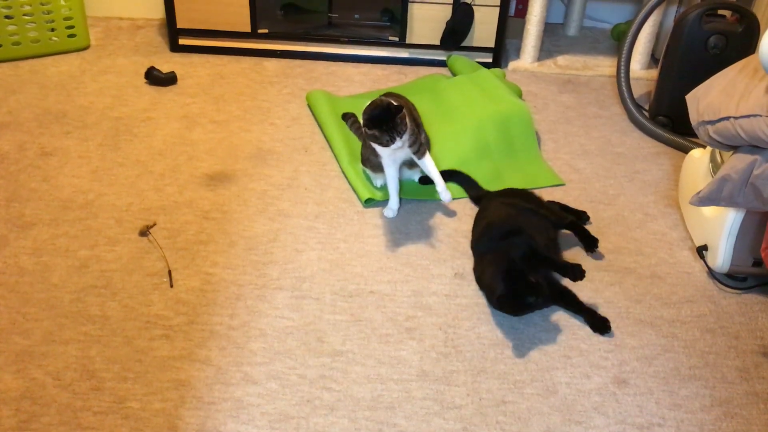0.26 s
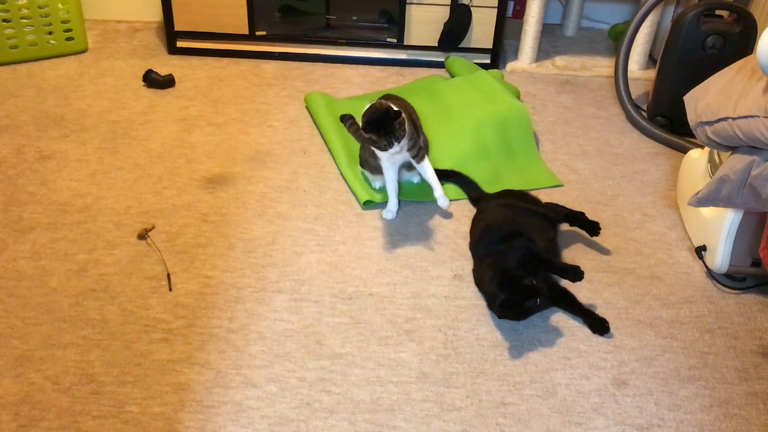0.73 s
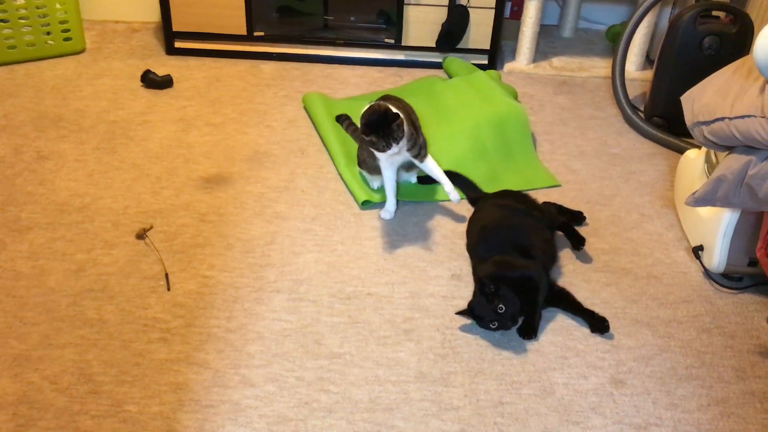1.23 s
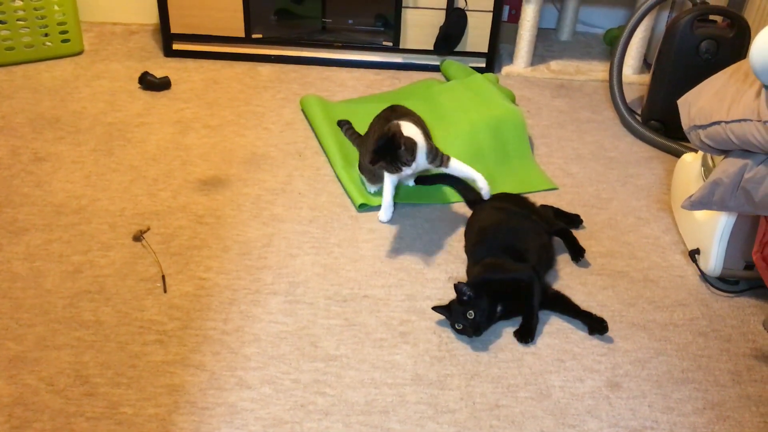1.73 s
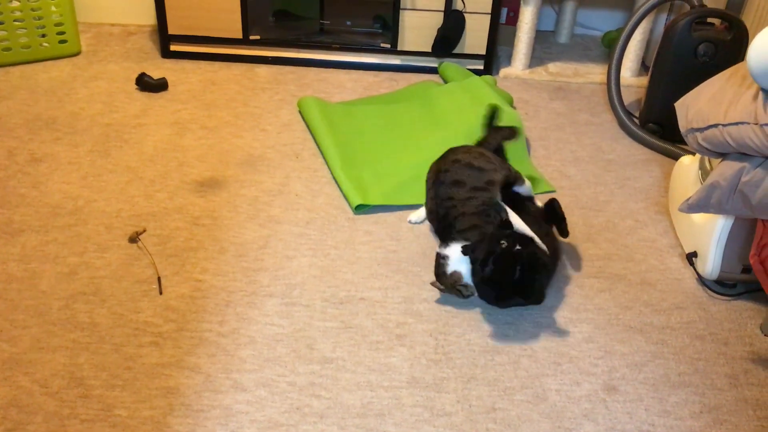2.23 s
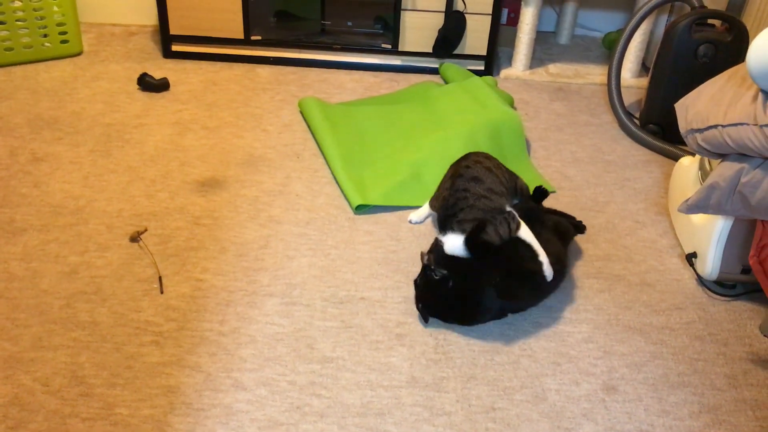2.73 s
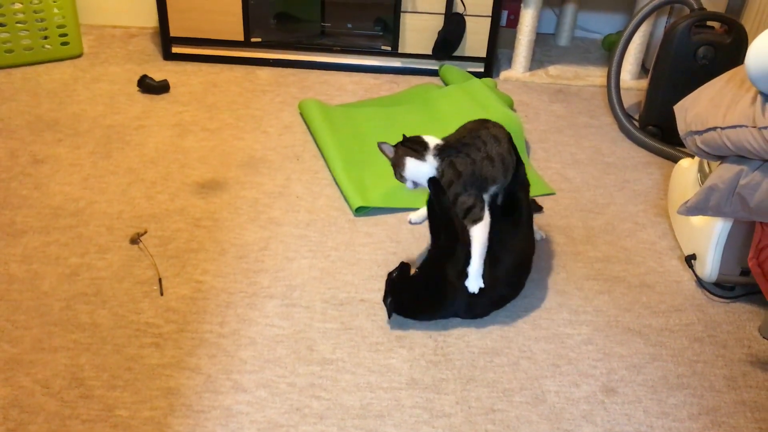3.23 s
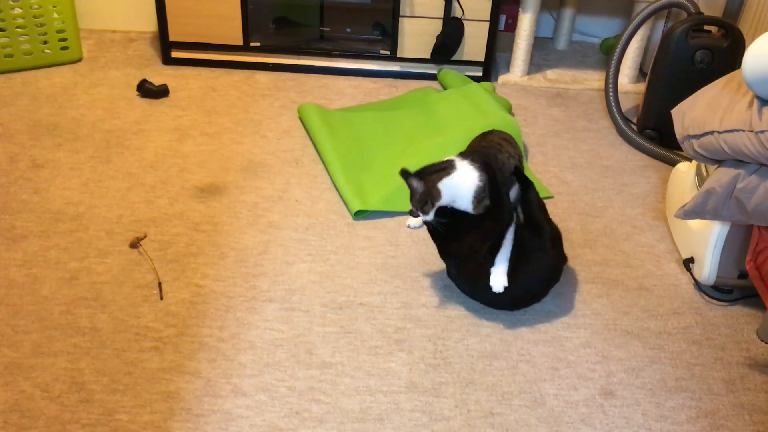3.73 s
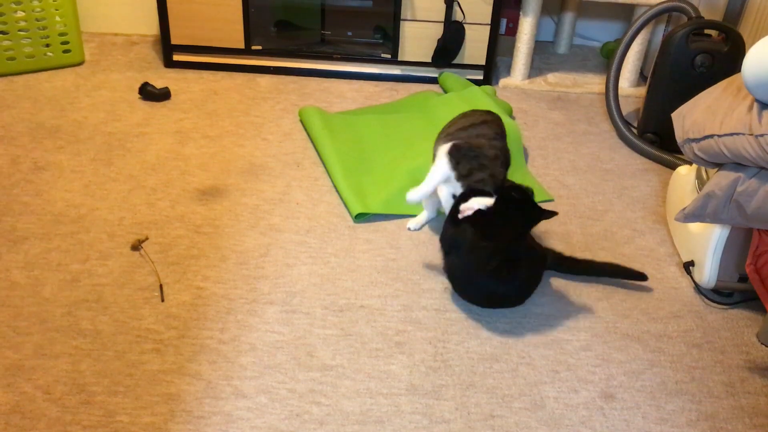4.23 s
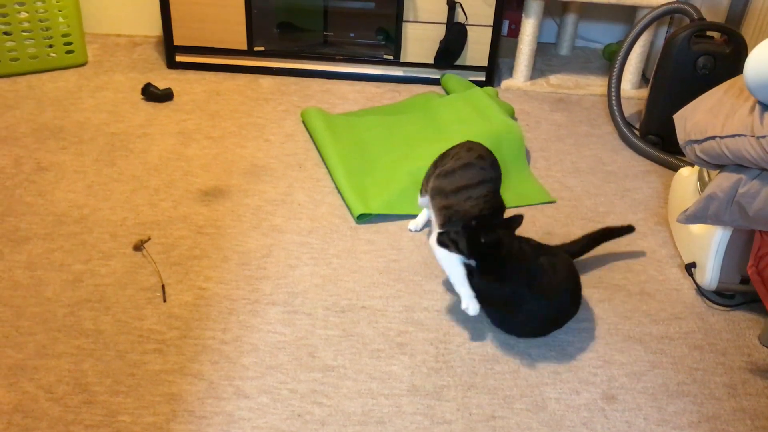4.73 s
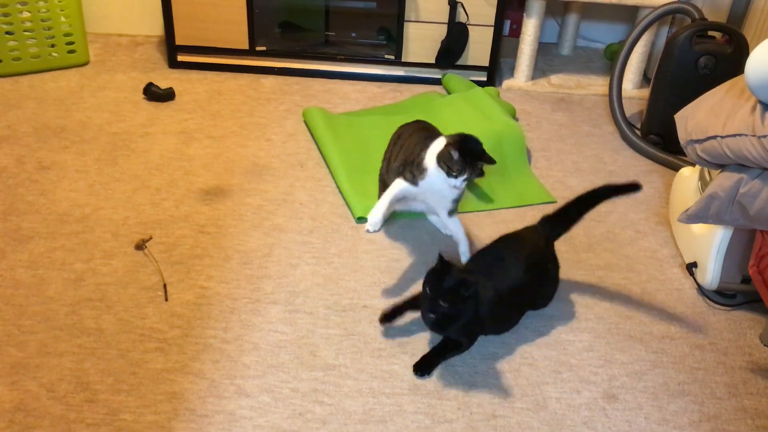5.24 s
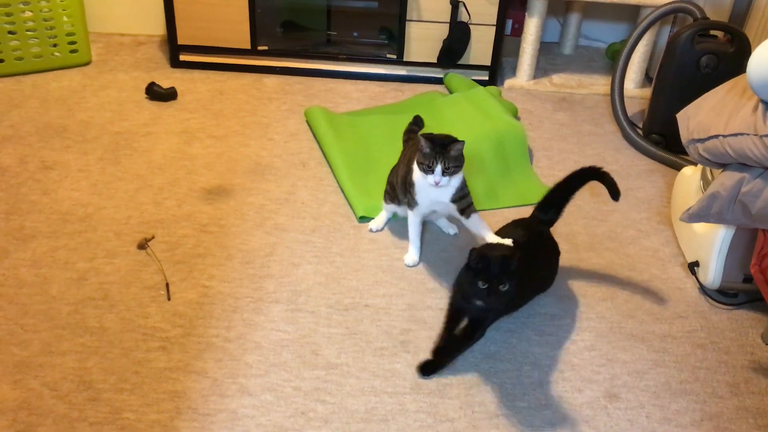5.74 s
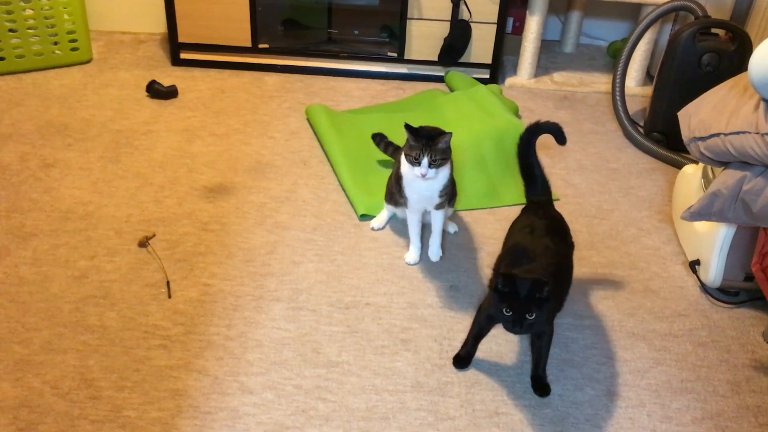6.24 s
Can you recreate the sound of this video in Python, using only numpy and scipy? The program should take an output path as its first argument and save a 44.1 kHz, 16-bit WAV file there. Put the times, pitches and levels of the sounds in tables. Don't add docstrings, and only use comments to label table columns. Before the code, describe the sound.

A quiet furnished living room, heard from a few metres away: a low, slightly wavering rumble and deep hum, soft hiss, and tiny high ticks about ten times a second close to the microphone. A very faint thin whine flutters underneath. Until 1.7 s there is almost nothing else, just slight rubs at 0.5 and 1.5. A soft slap at 1.75 and small claw clicks from 2.0 lead to a brief brushing scrape at 2.3. A firm slap and thud land at 2.45, then the deepest, heaviest floor thump at 2.58. Fur rustles, and another strong thud with crisp claw clicks comes at 3.05. Quiet brushing follows until light hollow knocks at 4.2, a click at 4.3 and fur sweeps to 4.7. Smaller dull thumps, pats and scuffs come at 4.75, 5.07, 5.35-5.45, 5.7, 5.93 and 6.3. The whine is slightly clearer after 4.2. The room echo is short.

```python
import sys
import numpy as np
from scipy import signal
from scipy.fft import rfft, irfft, dct
from scipy.io import wavfile
from scipy.ndimage import uniform_filter1d

SR = 44100
rng = np.random.default_rng(int(sys.argv[2]) if len(sys.argv) > 2 else 0)


def unload_audio(sound):
    columns = np.transpose(np.atleast_2d(sound))
    steps = np.round(np.clip(columns, -1, 1) * 32767)
    wavfile.write(sys.argv[1], SR, steps.astype(np.int16))


def gain_from_db(level_db):
    decades = np.asarray(level_db, float) / 20
    return 10 ** decades


N = 285327

# frequency in Hz, level in dB per Hz.
AIR_COLOUR = [(41, -18), (70, 4.5), (124, -6), (190, 0.5), (228, -6), (344, -10.5), (483, -15.5),
              (554, -14), (977, -18.5), (2660, -27.5), (2980, -24), (3330, -27), (10400, -33), (12500, -32),
              (16000, -38.5)]
AIR_DB = -62
RUMBLE_WAVER_DB, RUMBLE_WAVER_PER_S = 2.2, 9

# time in seconds, level in dB.
WHINE_LEVEL = [
    (0, -80),
    (1.6, -81.5),
    (2.1, -90),
    (2.25, -82),
    (2.305, -63),
    (2.36, -85),
    (3.0, -86.5),
    (3.85, -84.5),
    (4.2, -76.5),
    (6.47, -77.5),
]
WHINE_HZ, WHINE_FLUTTER_DB, WHINE_BEADS_PER_S = 2926, 7.0, 19
HUM_HZ, HUM_DB, HUM_PHASE = 39.56, -47.5, 4.1

# tick number, lateness in seconds, level change in dB.
ODD_TICKS = [
    (2, -.0126, 0),
    (4, -.0198, 0),
    (9, -.001, 0),
    (11, 0, -20),
    (12, .001, -9),
    (14, 0, -8),
    (24, 0, -20),
    (31, -.0079, 0),
    (34, 0, -9),
    (53, -.0194, 0),
]
TICK_START_S, TICK_PERIOD_S = .0596, .1024
TICK_DB, TICK_HZ, TICK_WIDTH_HZ = -50, 13300, 5500

# start in seconds, level in dB, pitch in Hz.
CLAW_CATCHES = [(2.002, -50, 6540), (2.0016, -49, 3200), (2.057, -53, 5000), (2.063, -47.5, 3800),
                (2.0867, -47.5, 3400), (2.1534, -57, 9000), (2.641, -46, 5100), (2.655, -42.5, 9000),
                (2.662, -50, 5500), (3.0528, -38.5, 4520), (3.054, -42.5, 1500), (3.0655, -44, 7040),
                (4.2985, -51, 9000), (4.3052, -41.5, 2930), (4.405, -52.5, 5470), (4.9427, -48, 6900),
                (5.3810, -66, 2200), (5.9480, -49.5, 4440)]
# middle in seconds, length in seconds, level in dB, pitch in Hz, width in Hz.
CLAW_SQUEAK = (5.425, .05, -74, 7100, 900)

# pitch in Hz, T60 in seconds.
BOARDS = [(78, 0.3), (88, 0.16), (112, 0.26), (137, 0.17), (175, 0.15), (196, 0.19), (240, 0.11),
          (265, 0.063), (300, 0.052), (350, 0.097), (444, 0.12), (743, 0.034)]
# start in seconds, level in dB, pitch struck in Hz, reach in octaves.
FALLS = [(2.278, -48, 144.5, 0.13), (2.459, -36, 365, 0.23), (2.46, -40.5, 188, 0.28),
         (2.460, -68, 743, .1), (2.577, -24, 89, .05), (2.58, -64, 188, 0.13), (2.658, -44.5, 79.5, 0.11),
         (3.046, -29.5, 171, 0.069), (3.047, -41.5, 270, 0.14), (3.056, -41.5, 150.5, 0.19),
         (3.064, -47, 245, 0.23), (3.085, -47.5, 140, .1), (3.1, -64, 220, 0.075), (4.752, -48, 195, 0.13),
         (4.752, -53, 288, 0.16), (4.81, -49.5, 205, .15), (4.857, -56, 134, .1),
         (5.068, -42, 116.4, 0.078), (5.066, -48.5, 265, 0.11), (5.085, -41, 176, 0.063),
         (5.335, -38.5, 87, 0.11), (5.385, -43, 175, 0.093), (5.439, -45.5, 140, .1),
         (5.46, -47, 82, 0.079), (5.689, -49.5, 184, 0.14), (5.928, -46, 118, 0.26),
         (6.267, -48.5, 135, .1), (6.321, -44, 129, 0.18), (6.322, -49, 175, 0.11)]
PINNED_DB = -24
# start in seconds, level in dB, pitch in Hz, T60 in seconds.
KNOCKS = [
    (4.181, -55, 1300, .06),
    (4.193, -56, 1450, .06),
    (5.059, -55, 985, .14),
    (6.314, -55, 1080, .07),
]

# pitch in Hz, width in Hz, level in dB.
FLESH = [
    (326, 336, 9),
    (576, 520, 1),
]
# pitch in Hz, width in Hz, level in dB.
FIBRES = [
    (3800, 3500, 0),
    (7500, 6000, -3),
    (13000, 8000, -8),
]
# start in seconds, pad level in dB, pad pitch in Hz,
# flesh in dB above the pad, fibres in dB above the pad.
SLAPS = [(1.735, -54, 1440, -16, -8), (2.063, -63.5, 1070, 9, -2), (2.459, -41.5, 840, -23, -34),
         (3.05, -66, 2800, -14, 8), (4.179, -54.5, 1250, -19, -14), (4.193, -60.5, 1330, -1, -29),
         (4.307, -63.5, 1520, 0, -8), (4.754, -56.5, 720, -4.5, -25), (5.058, -83, 930, 4, -16),
         (5.333, -70, 1300, 7, -1), (5.351, -58.5, 1010, 7.5, -33), (5.403, -60.5, 1580, 9, -14),
         (5.68, -63, 1390, 5, -10), (5.708, -55.5, 850, -24, -17), (6.315, -55, 1120, -4.5, -35)]
SLAP_T60_S, SLAP_AT_DB, SLAP_LONGER_PER_DB = 0.083, -47, 0.11
# middle in seconds, length in seconds, pad level in dB, pad pitch in Hz.
RUBS = [(0.502, 0.018, -72, 1400), (0.542, 0.028, -67.5, 1380), (1.526, 0.052, -71, 1450),
        (2.076, 0.057, -71, 1280), (2.309, 0.04, -50.5, 1000), (2.303, .046, -53.5, 1690),
        (2.305, 0.096, -66.5, 2690), (2.644, 0.04, -70.5, 1500), (3.553, 0.11, -76.5, 1420),
        (4.654, 0.045, -70, 1770), (4.804, 0.054, -74, 700), (5.338, 0.025, -59.5, 930),
        (5.386, .035, -54.5, 840), (1.768, 0.03, -63.5, 1500), (5.437, 0.045, -69.5, 2290),
        (5.72, 0.24, -80, 1504), (6.319, 0.018, -61.5, 2000), (6.426, 0.056, -68.5, 1390)]
RUB_FLESH_DB, RUB_FIBRES_DB = -72, -19
# middle in seconds, length in seconds, level in dB, flesh in dB above it.
SWEEPS = [(1.983, 0.13, -83, 7), (2.536, 0.057, -70, 9), (2.305, 0.11, -78, -18), (2.664, 0.037, -83, -8),
          (2.794, 0.56, -81.5, 6.5), (3.082, 0.018, -74, -15), (3.41, 0.2, -79.5, -10),
          (4.323, 0.2, -78.5, 7), (4.526, 0.1, -75, 0.5), (4.6, 0.094, -75, 2), (5.214, 0.22, -79.5, 9.5),
          (5.943, 0.14, -85.5, 15.5), (6.25, 0.13, -83.5, 17.5)]
SWEEP_HZ, SWEEP_FIBRES_DB = 1500, 3.5
PAD_WIDTH_SHARE = 0.77

ROOM_T60_S, ROOM_DB = 0.27, -7

NOTCH_HZ, NOTCH_WIDTH_HZ, NOTCH_SHARE = 10550, 660, 0.43
TOP_HZ = 15850
# middle in seconds, emptied above in Hz.
TREBLE_GAPS = [(.004, 3200), (.115, 3200), (.392, 3200), (.544, 3200), (.713, 2200), (.820, 1250),
               (.841, 3800), (1.013, 3200), (1.163, 1300), (1.184, 3200), (1.651, 1800), (1.822, 2200),
               (3.252, 1600), (3.572, 2200), (5.768, 2500), (6.326, 4000)]
# middle in seconds, thinned above in Hz.
TREBLE_THINS = [
    (1.462, 3200),
    (2.526, 3000),
    (2.762, 4500),
    (2.908, 3500),
    (2.996, 3500),
    (3.273, 1800),
    (3.871, 3500),
    (4.425, 3000),
    (6.281, 2600),
]
GAP_KEEP, THIN_KEEP = .022, .075


def unit(x):
    return x / np.sqrt(np.mean(x ** 2))


def band(x, hz, width):
    return signal.lfilter(*signal.iirpeak(hz, hz / max(width, 1), SR), x)


def body(x, modes):
    return unit(sum(gain_from_db(db) * band(band(x, hz, width), hz, width) for hz, width, db in modes))


def walk(rate):
    hold = int(SR / rate)
    steps = np.repeat(rng.standard_normal(N // hold + 1), hold)
    return 1.3 * uniform_filter1d(uniform_filter1d(steps, hold), hold)[:N]


def fade(t, t60):
    return (t >= 0) * np.exp(-np.log(1000) * np.clip(t, 0, 1) / max(t60, .005))


def swell(t, length):
    return np.exp(-.5 * (t / (0.37 * length)) ** 2)


def uneven_grains(shape):
    return rng.standard_normal(shape) * gain_from_db(2.5 * rng.exponential(size=shape))


def add(out, s, sound):
    at = int(s * SR)
    out[at:at + len(sound)] += sound[:N - at]


def air():
    hz = np.fft.rfftfreq(N, 1 / SR)
    f, db = np.transpose(AIR_COLOUR)
    colour = gain_from_db(np.interp(np.log(hz + 1), np.log(f), db, left=-90))
    low = 1 / (1 + (hz / 400) ** 2)
    noise = rfft(rng.standard_normal(N)) * colour
    rumble = irfft(noise * low, N) * gain_from_db(RUMBLE_WAVER_DB * walk(RUMBLE_WAVER_PER_S))
    hiss = irfft(noise * (1 - low), N)
    return gain_from_db(AIR_DB) * unit(rumble + hiss)


def pump(t):
    hum_level = gain_from_db(HUM_DB + 0.19 * walk(1.7))
    hum = hum_level * np.sqrt(2) * np.sin(2 * np.pi * HUM_HZ * t + HUM_PHASE)
    beads = np.sin(2 * np.pi * WHINE_BEADS_PER_S * t + 2.5 * walk(9)) + .6 * walk(50) + .3
    tone = np.sin(2 * np.pi * WHINE_HZ * t + .4 * walk(30))
    whine = unit(tone * gain_from_db(WHINE_FLUTTER_DB * np.tanh(2 * beads)))
    return hum + whine * gain_from_db(np.interp(t, *np.transpose(WHINE_LEVEL)))


def drive_ticks():
    count = int((N / SR - TICK_START_S) / TICK_PERIOD_S) + 1
    when = TICK_START_S + TICK_PERIOD_S * np.arange(count)
    db = TICK_DB + 0.83 * rng.standard_normal(count)
    for k, late, change in ODD_TICKS:
        when[k] += late
        db[k] += change
    at = (when * SR).astype(int)
    spikes = np.zeros(N)
    spikes[at] = gain_from_db(db)
    spikes[at + int(.0009 * SR)] = gain_from_db(db - 6)
    tick = band(band(spikes, TICK_HZ, TICK_WIDTH_HZ), TICK_HZ, TICK_WIDTH_HZ)
    return 3.5 * (tick + .15 * band(spikes, 8200, 2800))


def claw_clicks():
    spike = np.eye(1, 400)[0]
    out = np.zeros(N)
    for s, db, hz in CLAW_CATCHES:
        click = band(band(spike, hz, .9 * hz), hz, .9 * hz)
        add(out, s, gain_from_db(db) * click / np.abs(click).max())
    return out


def claw_squeak(t):
    s, length, db, hz, width = CLAW_SQUEAK
    return swell(t - s, length) * gain_from_db(db) * body(uneven_grains(N), [(hz, width, 0)])


def thumps(t):
    rings = list(KNOCKS)
    for s, db, near_hz, reach in FALLS:
        for hz, t60 in BOARDS:
            far_db = 6 * (np.log2(hz / near_hz) / reach) ** 2
            if far_db < 30:
                rings.append((s, db - far_db, hz, t60 / (1 + gain_from_db(db - PINNED_DB))))
    since = t[:SR // 2]
    shake = rng.standard_normal(N + SR)
    out = np.zeros(N)
    for s, db, hz, t60 in rings:
        soft = 1 - fade(since, 800 / hz ** 2 + .004)
        at = int(s * SR)
        loose = .3 * body(shake[at:at + SR // 2], [(1.2 * hz, .7 * hz, 0)])
        ring = np.sin(2 * np.pi * hz * since) + loose
        add(out, s, gain_from_db(db) * soft * fade(since, t60) * ring)
    return out


def paws(t):
    flesh_grains, fibre_grains, pad_grains = uneven_grains((3, N + SR))
    flesh, fibres = body(flesh_grains, FLESH), body(fibre_grains, FIBRES)
    jerks = np.resize(gain_from_db(2.5 * walk(120)), N + SR)
    near = t[:SR] - .5
    presses = []
    for s, db, hz, flesh_db, fibres_db in SLAPS:
        t60 = SLAP_T60_S * gain_from_db(SLAP_LONGER_PER_DB * (db - SLAP_AT_DB))
        presses.append((s, fade(near, t60), db, hz, flesh_db, fibres_db))
    for s, length, db, hz in RUBS:
        presses.append((s, swell(near, length), db, hz, RUB_FLESH_DB - db, RUB_FIBRES_DB))
    for s, length, db, flesh_db in SWEEPS:
        presses.append((s, swell(near, length), db, SWEEP_HZ, flesh_db, SWEEP_FIBRES_DB))
    out = np.zeros(N)
    for s, press, db, hz, flesh_db, fibres_db in presses:
        start = int((s - .5) * SR)
        at = slice(start, start + SR)
        pad = jerks[at] * body(pad_grains[at], [(hz, PAD_WIDTH_SHARE * hz, 0)])
        pad *= np.linalg.norm(press) / np.linalg.norm(press * pad)
        soft_parts = jerks[at] * (gain_from_db(flesh_db) * flesh[at] + gain_from_db(fibres_db) * fibres[at])
        add(out, s - .5, press * gain_from_db(db) * (pad + soft_parts))
    return out


def room(dry):
    since = np.arange(SR // 2) / SR
    tail = rng.standard_normal(SR // 2) * fade(since - .004, ROOM_T60_S)
    return gain_from_db(ROOM_DB) * signal.fftconvolve(dry, tail / np.linalg.norm(tail))[:N]


def scene():
    t = np.arange(N) / SR
    background = air() + pump(t) + drive_ticks()
    cats = claw_clicks() + claw_squeak(t) + thumps(t) + paws(t)
    return (background + cats + room(cats))[None]


def thin_treble(x, size=1880):
    y = np.pad(x, size)
    full = y.copy()
    window = np.sin(np.pi * (np.arange(size) + .5) / size)
    hz = np.arange(size) * SR / 2 / size
    moments = [(*row, GAP_KEEP) for row in TREBLE_GAPS] + [(*row, THIN_KEEP) for row in TREBLE_THINS]
    for s, cut_hz, share in moments:
        start = int(s * SR) + size // 2
        at = slice(start, start + size)
        lines = dct(full[at] * window)
        level = np.abs(lines)
        stand = uniform_filter1d(level, size=3) / (uniform_filter1d(level, size=400) + 1e-12)
        stand = stand / (hz + 1000) ** .45
        high = (hz > cut_hz) & (hz < TOP_HZ + 200)
        lost = high & (stand < np.quantile(stand[high], 1 - share))
        kept = high & ~lost
        change = lines * (lost - .5 * kept)
        y[at] -= window * dct(change, type=3) / (2 * size)
    return y[size:-size]


def low_pass(x):
    return signal.sosfilt(signal.butter(12, 16430, fs=SR, output="sos"), x)


def record(dry):
    x = dry[0] - NOTCH_SHARE * band(dry[0], NOTCH_HZ, NOTCH_WIDTH_HZ)
    over_hz = np.fft.rfftfreq(N, 1 / SR) - TOP_HZ
    x = irfft(rfft(x) * gain_from_db(np.interp(over_hz, [-150, 250], [0, -24])), N)
    return low_pass(thin_treble(x)[None])


dry = scene()
out = record(dry)
unload_audio(out)
```